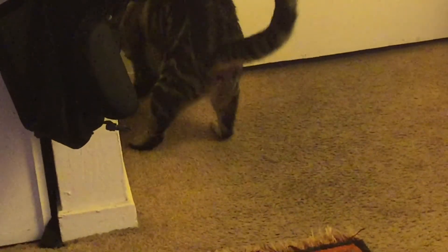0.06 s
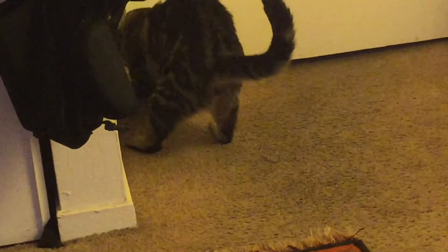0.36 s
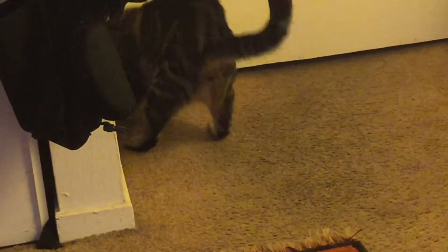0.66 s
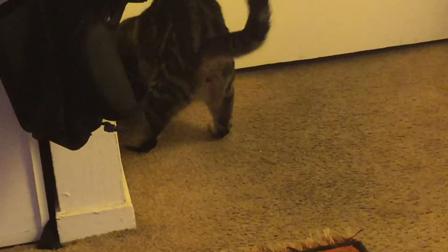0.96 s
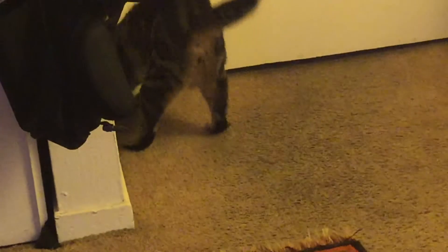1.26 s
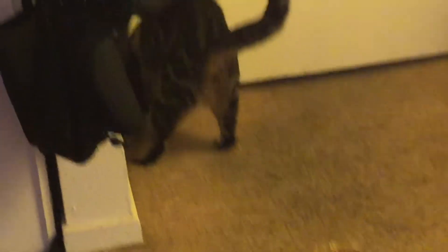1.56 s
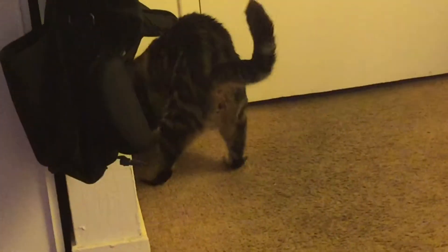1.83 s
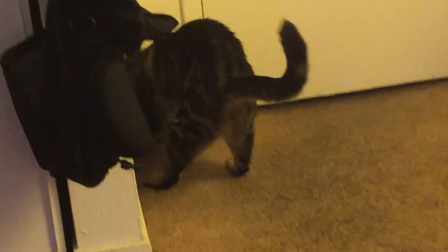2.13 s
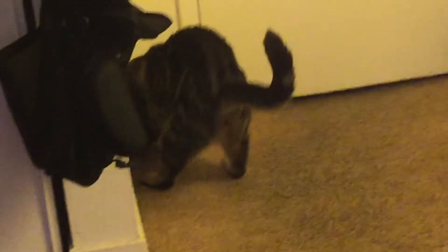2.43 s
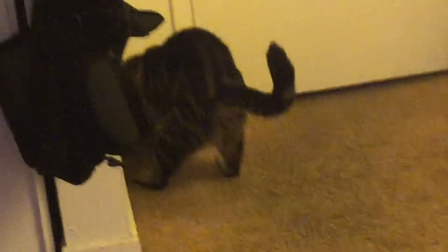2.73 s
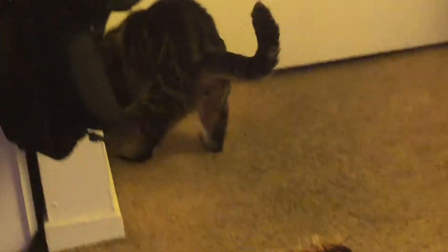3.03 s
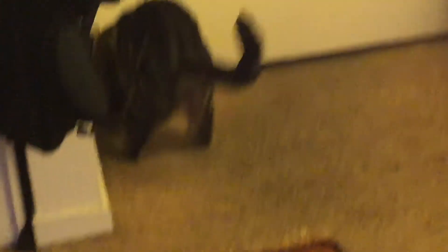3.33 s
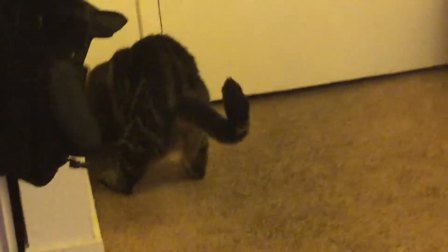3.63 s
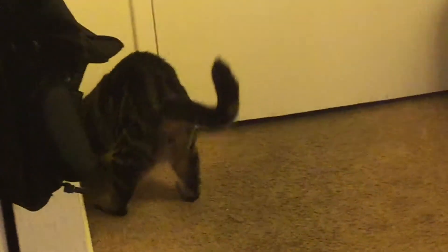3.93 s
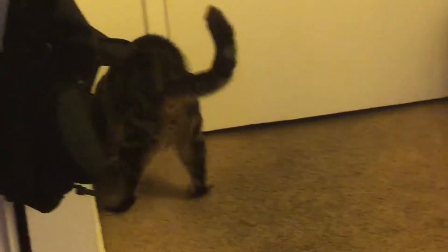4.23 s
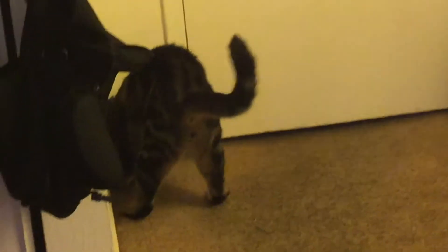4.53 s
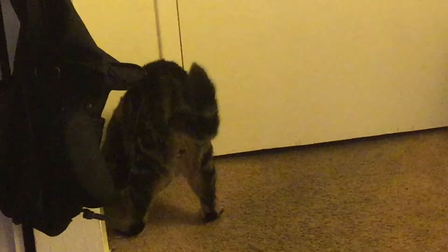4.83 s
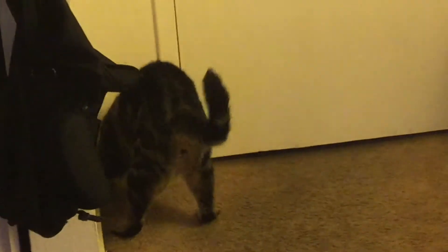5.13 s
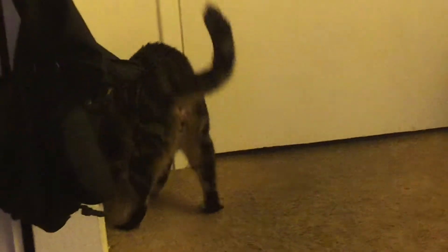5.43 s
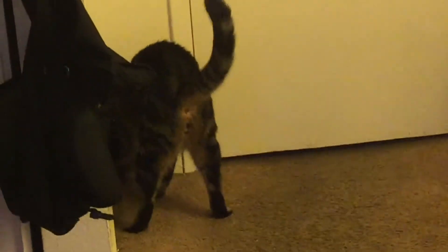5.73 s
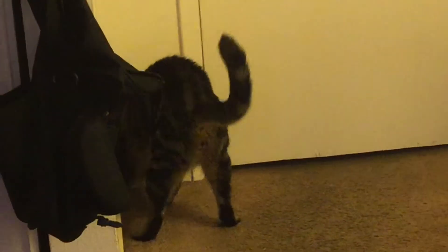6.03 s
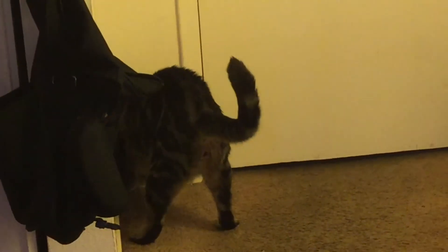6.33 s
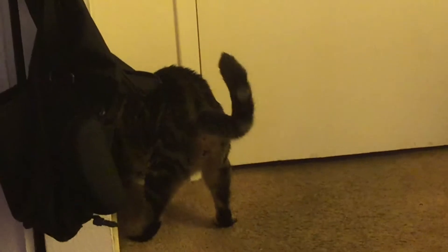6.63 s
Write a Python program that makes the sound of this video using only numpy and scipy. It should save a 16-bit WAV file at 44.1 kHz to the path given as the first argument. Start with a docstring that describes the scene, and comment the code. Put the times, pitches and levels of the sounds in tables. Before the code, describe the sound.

Irregular hollow knocks and light claw scuffs as a cat works at a wooden door, with a faint low drone indoors.

```python
"""A cat paws at a closed hollow wooden door, heard from inside a small carpeted room.
Its claws catch and slip on the paint, scuffing and hissing; the stronger pulls knock the door against
its frame, where the latch ticks, the wood chatters and the hollow panel booms.
Behind it an appliance hums faintly and a soft tone comes and goes twice. From far off, a low drone
like an engine outdoors comes through the walls and swells in the second half."""
import sys
import numpy as np
from scipy import signal
from scipy.fft import rfft, irfft
from scipy.io import wavfile
from scipy.ndimage import uniform_filter1d

SR = 44100
rng = np.random.default_rng(int(sys.argv[2]) if len(sys.argv) > 2 else 0)


def wav_out(sig):
    """Save sig, one row per channel (or a flat mono array), as 16-bit PCM at SR to the path in sys.argv[1]."""
    wavfile.write(sys.argv[1], SR, np.round(np.clip(np.atleast_2d(sig).T, -1, 1) * 32767).astype(np.int16))


N = 294492
RING_S = .6  # time given to each contact to ring out
TIME = np.arange(N) / SR
AGE = TIME[:int(RING_S * SR)]

# Clear claw strokes. Each row: start in seconds, length in seconds, wood scuff in dB, claw hiss in dB.
STROKES = [(.337, 0.027, -59, -64), (0.451, 0.018, -70, -82), (0.488, .016, -51, -56.5),
           (0.711, 0.029, -55, -66.5), (0.746, 0.01, -58, -66), (0.799, .015, -55, -66),
           (1.052, 0.06, -64.5, -72.5), (1.167, 0.017, -66, -70.5), (1.237, .018, -52.5, -70),
           (1.619, 0.018, -65, -69.5), (1.636, .041, -51.5, -73), (1.958, 0.052, -63, -70),
           (2.241, .012, -52.5, -72), (2.282, 0.068, -51, -68), (2.374, 0.0069, -51.5, -68.5),
           (2.392, 0.033, -49.5, -66), (2.542, 0.089, -65.5, -74.5), (2.857, .016, -61.5, -75),
           (2.894, 0.031, -66.5, -74.5), (3.122, 0.0026, -79, -82), (3.194, 0.018, -58, -80),
           (3.258, 0.016, -47.5, -63.5), (3.791, 0.031, -66.5, -85), (3.919, 0.018, -59.5, -75.5),
           (3.991, 0.0093, -64.5, -82), (4.486, .035, -67.5, -82), (5.219, 0.037, -68.5, -79),
           (5.296, 0.022, -62.5, -70.5), (5.832, .019, -71, -84), (6.57, 0.015, -63, -77)]
# Shrill skids of a claw. Each row: start in seconds, pitch in Hz, level in dB.
CLAW_SKIDS = [(.064, 5370, -68.5), (0.751, 5460, -66), (2.247, 6150, -73.5)]
# The door hitting its frame. Each row: start in seconds, wood clack in dB, panel boom in dB,
# latch tick in dB, boom tilt in dB per octave, frequency favoured by the point of contact in Hz.
DOOR_KNOCKS = [(0.0, -49.5, -41, -65, -8.5, 746), (.064, -56.5, -47, -67, 4, 530),
               (.151, -53.5, -48.5, -70.5, 11.5, 1430), (.521, -35.5, -67, -53.5, 1, 790),
               (.527, -39, -28, -76, -1, 1350), (.727, -50.5, -54, -70, 21, 750),
               (.812, -53, -40.5, -84, -10, 1680), (1.346, -41, -32, -52.5, 4.5, 1240),
               (1.365, -51.5, -34, -77, -5, 1400), (1.42, -70, -41.5, -92, -8.5, 800),
               (2.007, -45.5, -43.5, -56.5, 4.5, 1460), (2.727, -47.5, -53, -63.5, 7.5, 1520),
               (2.948, -39, -34.5, -53.5, -4, 1260), (3.213, -51.5, -44, -70, 3, 785),
               (3.278, -48, -43, -70, 2.5, 1360), (4.051, -49, -46.5, -85, 11, 710),
               (4.237, -39.5, -31.5, -56, 2.5, 760), (4.655, -39.5, -38, -65.5, 4, 730),
               (4.671, -40.5, -36, -61.5, 5, 1080), (5.602, -36, -29.5, -53.5, 4, 700),
               (5.628, -47, -41.5, -66, 1, 550), (6.575, -56.5, -55, -77, 9, 520)]
# Hollow panel modes. Each row: frequency in Hz, relative level in dB, seconds to fall 60 dB.
PANEL_MODES = [(53.4, -28.5, 0.42), (132, -12, 0.54), (144.7, -9, 0.2), (190.2, -13, 0.37),
               (222.9, 2, 0.26), (242, -0.5, 0.15), (272, -5.5, 0.14), (320.5, -11, 0.31),
               (330.6, -13.5, 0.3), (382, -9, 0.18), (435.3, -8, 0.16), (488, -5, 0.075), (507.5, -20, 0.3),
               (518.7, -9, 0.11)]
# Stile and frame modes. Each row: frequency in Hz, relative level in dB.
FRAME_MODES = [(598, -17), (662, -1.5), (718, -1), (760, 4.5), (785, 5), (872, -18), (975, -12), (1015, 1),
               (1090, -13), (1150, -27), (1243, 2), (1325, -10.5), (1358, -17), (1465, -39), (1593, -14),
               (1683, -1), (1730, -2.5), (1846, 0), (2030, -8), (2230, -24), (2450, -24), (3200, -11),
               (3580, -34)]
# Noise colours. Each row: frequency in Hz, relative spectral density in dB.
SCUFF_SPECTRUM = [(250, -13), (500, 9.5), (800, 2.5), (1300, 5.5), (2200, -4), (2900, -8.5), (3700, -11),
                  (5500, -19), (9000, -27)]  # scraped wood
HISS_SPECTRUM = [(1500, -18), (3500, 2.5), (5800, 1), (7400, -1), (9000, 5), (12500, 2.5), (15500, -6)]  # claw on paint
BOOM_SPECTRUM = [(25, -50), (38, -24), (52, -28), (80, -16), (130, 3.5), (250, 6.5), (450, -6.5),
                 (600, -14), (900, -25.5)]  # hollow panel
CLACK_SPECTRUM = [(250, 0), (480, -0.5), (780, 2), (900, 0), (1300, -2), (1900, -4), (2400, -8),
                  (2850, -12.5), (3500, -17), (5000, -24.5), (8000, -30.5)]  # struck door edge
LATCH_SPECTRUM = [(1500, -30), (3500, 15.5), (5000, 9.5), (7200, 3), (9000, 9), (12500, 7), (15500, 0)]  # ticking latch
RUMBLE_SPECTRUM = [(20, -13), (40, -8.5), (60, 7), (85, 1.5), (120, 10), (210, -10.5), (340, -2.5),
                   (480, -17.5), (800, -18.5), (1100, -24), (2200, -33.5), (4500, -42.5), (9000, -60)]  # engine through the walls
ROOM_SPECTRUM = [(20, -24), (35, -16), (54, 2), (75, -6), (110, 7.5), (150, -6.5), (230, -4), (330, -5),
                 (480, -23), (800, -24.5), (1200, -26.5), (2200, -34), (5000, -41.5), (14000, -42)]  # the quiet room
# The far engine's partials. Each row: multiple of the drone's pitch, relative level in dB.
ENGINE_PARTIALS = [(.615, -8.5), (1, 1), (1.095, -19), (1.5, -15.5), (3, -22)]
# The course of its drone. Each row: time in seconds, level in dB.
DRONE_LEVELS = [(3.1, -81), (3.6, -57.5), (4.3, -65), (4.8, -54.5), (5.4, -58), (5.9, -47.5), (6.3, -48),
                (6.68, -54)]
# Faint tones. Each row: middle in seconds, length in seconds, middle pitch in Hz, top level in dB.
FAINT_TONES = [(0.091, 0.38, 303, -60), (1.853, 0.55, 308.6, -63.5)]
# The appliance's partials. Each row: frequency in Hz, level in dB.
HUM_PARTIALS = [(53.2, -71), (105.5, -77.5), (159.2, -72.5), (264.5, -71.5), (316, -78.5)]


def pawing():
    """The cat works at the door; a firmer stroke stirs the panel more and sounds duller."""
    out = np.zeros(N)
    usual_scuff_db = -59
    for s, length_s, scuff_db, hiss_db in STROKES + light_touches(count=7):
        firm_db = scuff_db - usual_scuff_db
        boom_db = -54.5 + .84 * firm_db
        tilt_db = 1.4 - .2 * firm_db  # per octave
        add(out, s, stroke(length_s, scuff_db, boom_db, hiss_db, tilt_db))
    return out


def light_touches(count, first_s=.25, last_s=3.5, length_s=.07, scuff_db=-76, hiss_db=-89):
    """The paw brushes the door at uneven moments; gives rows like those of STROKES."""
    when, size = rng.random((count, 2)).T
    starts = first_s + (last_s - first_s) * (np.arange(count) + when) / count
    offsets_db = 3 * (2 * size - 1)
    return [(s, length_s, scuff_db + db, hiss_db + db) for s, db in zip(starts, offsets_db)]


def stroke(length_s, scuff_db, boom_db, hiss_db, tilt_db):
    """Claws drag over the paint, hissing and gently stirring the wood and the panel."""
    wood = burst(wash(tilted(SCUFF_SPECTRUM, tilt_db, 1000), early_t60=.0099, room_t60=.24, room_db=-1))
    wood += burst(frame_ring(tilted(FRAME_MODES, tilt_db, 1000)), -4.5)
    panel = burst(modes(PANEL_MODES, scatter_db=4.5, detune=.0048), -.38)
    panel += burst(wash(BOOM_SPECTRUM, early_t60=.29, room_t60=.38, room_db=-22))
    hiss = wash(HISS_SPECTRUM, early_t60=.0015, room_t60=.15, room_db=-3)
    force = slips(length_s, scatter_db=5, count=12)
    parts = [(wood, scuff_db), (panel, boom_db), (hiss, hiss_db)]
    return sum(burst(drive(force, part), db) for part, db in parts)


def skid(hz, db):
    """Quick slips ring the claw itself in a narrow band."""
    band = [(hz / 2, -40), (hz * .8, -12), (hz, 0), (hz * 1.15, -4), (hz * 1.4, -30)]
    force = slips(.016, scatter_db=3, count=8)
    claw = wash(band, early_t60=.01, room_t60=.28, room_db=-18)
    return burst(drive(force, claw), db)


def slips(length_s, scatter_db, count):
    """A claw catches and slips many times; its pressure swells and eases within the stroke."""
    force = np.zeros(len(AGE))
    progress = (np.arange(count) + rng.random(count)) / count
    pressure = np.sin(np.pi * progress) ** .15
    catches = rng.choice([-1, 1], count) * undb(scatter_db * rng.standard_normal(count))
    force[(progress * length_s * SR).astype(int)] = pressure * catches
    return force


def knocks(rebound_s=.027):
    """A strong pull rubs the door along the frame, strikes it and lets it rebound once, more softly."""
    out = np.zeros(N)
    for s, clack_db, boom_db, tick_db, boom_tilt_db, contact_hz in DOOR_KNOCKS:
        colour = boom_tilt_db, contact_hz
        add(out, s, knock(clack_db, boom_db, tick_db, *colour))
        add(out, s + rebound_s, knock(clack_db - 25, boom_db - 17, tick_db - 25, *colour))
        if s > RING_S:
            add(out, s + .00211 - RING_S, edge_rub(clack_db - 21.5))  # peaks as the blow lands
    return out


def knock(clack_db, boom_db, tick_db, boom_tilt_db, contact_hz, build_s=.0018):
    """The door meets the frame: the hollow panel booms, the wood chatters, the latch ticks."""
    panel = burst(modes(tilted(PANEL_MODES, boom_tilt_db, 250), scatter_db=1, detune=.002))
    boom_colour = tilted(BOOM_SPECTRUM, boom_tilt_db, 250)
    panel += burst(wash(boom_colour, early_t60=.25, room_t60=.32, room_db=-17), -4)
    wood = wash(struck_at(CLACK_SPECTRUM, contact_hz), early_t60=.11, room_t60=.25, room_db=8)
    clack = burst(drive(chatter(loss_db=9.5), wood))
    clack += burst(frame_ring(struck_at(FRAME_MODES, contact_hz)), -3.5)
    tick = drive(chatter(loss_db=5), wash(LATCH_SPECTRUM, early_t60=.008, room_t60=.21, room_db=-15))
    # the heavy panel starts more slowly than the edge that is struck
    slow, quick = rise(build_s), rise(build_s / 2)
    return burst(panel * slow, boom_db) + burst(clack * quick, clack_db) + burst(tick * quick, tick_db)


def struck_at(table, contact_hz, neutral_hz=1154, lift_db=5):
    """The point of contact lifts the resonances near contact_hz; the higher, the brighter the clack."""
    table = tilted(table, 3.5 * np.log2(contact_hz / neutral_hz), 1000)
    octaves_away = np.log2(table[:, 0] / contact_hz)
    table[:, 1] += lift_db * np.exp(-(octaves_away / .3) ** 2)
    return table


def chatter(loss_db, gap_s=.006, count=3):
    """The force of a blow followed by uneven, weakening bounces."""
    force = np.zeros(len(AGE))
    bounces_s = np.cumsum(gap_s * (.5 + rng.random(count)))
    force[0] = 1
    force[(bounces_s * SR).astype(int)] = undb(-loss_db * np.arange(1, count + 1))
    return force


def edge_rub(db):
    """The door's edge rubs along the frame, swelling just before it strikes."""
    return burst((noise(SCUFF_SPECTRUM, len(AGE)) * fade(.041))[::-1], db)


def frame_ring(table):
    """The solid wood rings briefly, its high modes shortest."""
    hz, db = table.T
    t60 = .17 * (hz / 1000) ** -.2
    return modes(np.c_[hz, db, t60], scatter_db=2, detune=.003)


def modes(table, scatter_db, detune):
    """Ringing modes, neighbours in opposite phase; level and pitch scatter with each contact."""
    hz, db, t60 = np.transpose(table)[:, :, None]
    size, shift = rng.standard_normal((2, len(table), 1))
    polarity = (-1) ** np.arange(len(table))[:, None]
    envelopes = undb(db + scatter_db * size) * fade(t60)
    return np.sum(polarity * envelopes * np.sin(2 * np.pi * hz * (1 + detune * shift) * AGE), axis=0)


def wash(spectrum, early_t60, room_t60, room_db):
    """Countless small resonances: the direct sound, then the small room's tail."""
    decay = np.hypot(fade(early_t60), undb(room_db) * fade(room_t60))
    return noise(spectrum, len(AGE)) * rise(.0007) * decay


def engine(idle_hz=104, pulls_away_s=3, rise_hz_per_s2=.75, swell_s=2.53):
    """A far engine idles, then gains speed ever faster; mostly its bass comes through the walls."""
    pulling_s = np.maximum(TIME - pulls_away_s, 0)
    phase = 2 * np.pi * np.cumsum(idle_hz + rise_hz_per_s2 * pulling_s ** 2) / SR
    drone = sum(undb(db + 2.4 * walk(12)) * np.sin(k * phase + .35 * k * walk(8))
                for k, db in ENGINE_PARTIALS)
    drone_db = np.interp(TIME, *np.transpose(DRONE_LEVELS))
    swell = np.sin(np.pi / 2 * np.minimum(pulling_s / swell_s, 1)) ** 2
    rumble = swell * undb(-53.5 + 2 * walk(9)) * noise(RUMBLE_SPECTRUM, N)
    return np.sqrt(2) * undb(drone_db) * drone + rumble


def faint_tone(middle_s, length_s, hz, db, rise_hz_per_s=21):
    """A faint tone swells and fades while its pitch creeps up."""
    t = TIME - middle_s
    swell = np.cos(np.pi * np.clip(t / length_s, -.5, .5)) ** 2
    return np.sqrt(2) * undb(db) * swell * np.sin(2 * np.pi * (hz + rise_hz_per_s * t / 2) * t)


def room():
    """An appliance's wavering hum over soft room tone."""
    hum = sum(undb(db + 2.8 * walk(3.4)) * np.sin(2 * np.pi * hz * TIME + .33 * walk(4))
              for hz, db in HUM_PARTIALS)
    return np.sqrt(2) * hum + undb(-61.5 + 1.1 * walk(4)) * noise(ROOM_SPECTRUM, N)


def drive(force, response):
    """Sound of a resonator under a train of contacts."""
    return signal.fftconvolve(force, response)[:len(AGE)]


def tilted(table, slope_db, pivot_hz):
    """Lean a table's levels by slope_db per octave about the pivot."""
    table = np.array(table, float)
    table[:, 1] += slope_db * np.log2(table[:, 0] / pivot_hz)
    return table


def rise(build_s):
    """Contact force grows smoothly."""
    return 1 - np.exp(-(AGE / build_s) ** 2)


def fade(t60):
    """Exponential decay, 60 dB in t60 seconds."""
    return np.exp(-np.log(1000) * AGE / t60)


def noise(spectrum, size):
    """Noise of rms 1 with the given colour."""
    hz, db = np.transpose(spectrum)
    log_hz = np.log(np.fft.rfftfreq(size, 1 / SR) + 1)
    gain = undb(np.interp(log_hz, np.log(hz), db, right=-90))
    x = irfft(rfft(rng.standard_normal(size)) * gain, size)
    return x / x.std()


def walk(rate_hz):
    """Smooth random wander, spread near 1."""
    knots = rng.standard_normal(400)
    path = np.interp(TIME * rate_hz, np.arange(len(knots)), knots)
    return uniform_filter1d(path, int(SR / rate_hz / 2) + 1)


def burst(x, db=0):
    """Scale a short sound to a level, its energy counted over 25 ms."""
    return x * undb(db) / np.sqrt(np.sum(x ** 2) / (.025 * SR))


def undb(db):
    """Decibels to gain."""
    return 10 ** (np.asarray(db) / 20)


def add(track, s, x):
    """Lay a sound into the track at s seconds."""
    i = max(int(s * SR), 0)
    track[i:i + len(x)] += x[:max(N - i, 0)]


def scene():
    """One microphone in the room: the cat at the door in front, the house and far engine behind."""
    out = room() + engine() + knocks() + pawing()
    out += sum(faint_tone(*row) for row in FAINT_TONES)
    for s, hz, db in CLAW_SKIDS:
        add(out, s, skid(hz, db))
    return out[None]


def record(dry, bottom_hz=28, top_hz=15500):
    """The microphone loses the deepest bass and the recorder cuts the top."""
    thin = signal.sosfilt(signal.butter(2, bottom_hz, "high", fs=SR, output="sos"), dry)
    return signal.sosfilt(signal.ellip(10, .2, 70, top_hz, fs=SR, output="sos"), thin)


dry = scene()
out = record(dry)
wav_out(out)
```